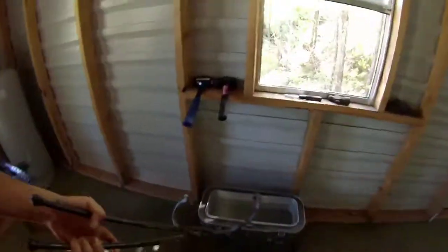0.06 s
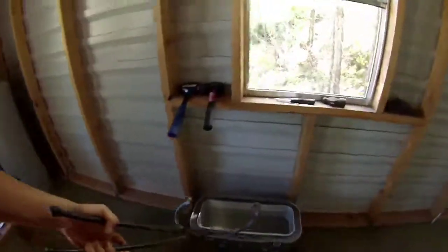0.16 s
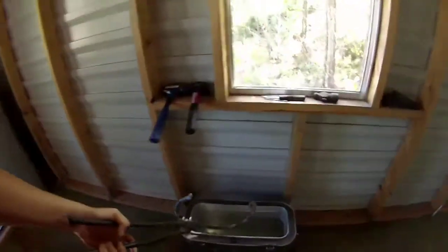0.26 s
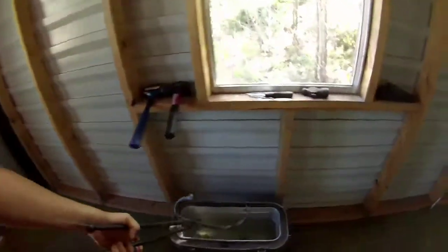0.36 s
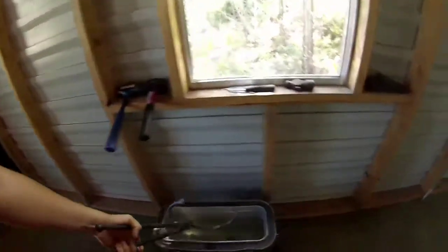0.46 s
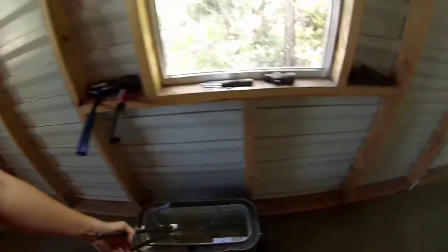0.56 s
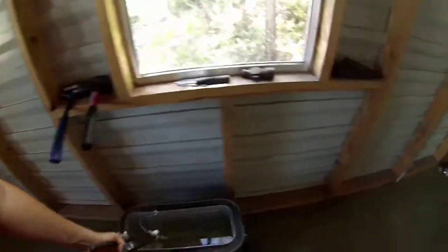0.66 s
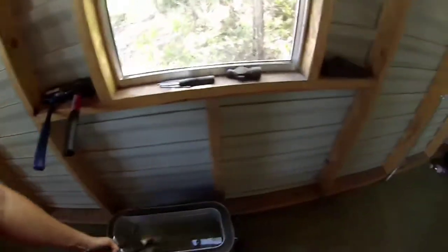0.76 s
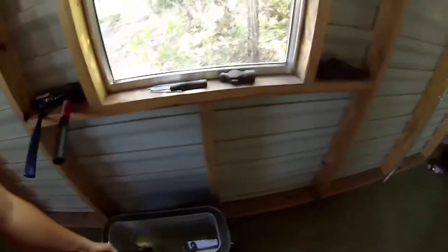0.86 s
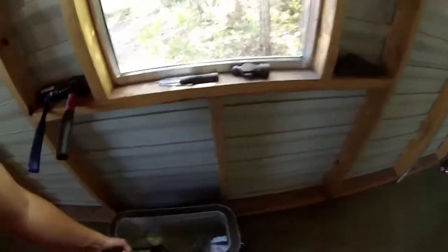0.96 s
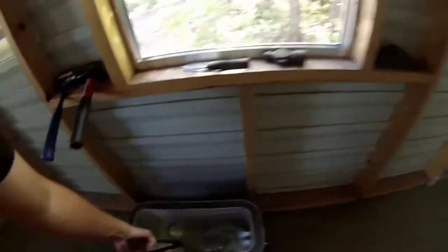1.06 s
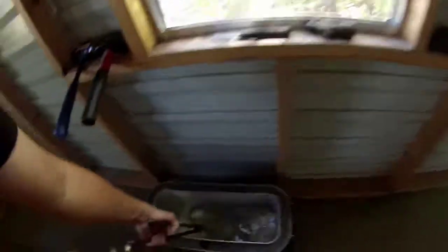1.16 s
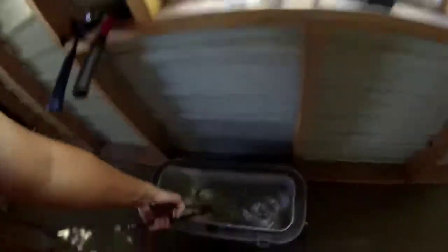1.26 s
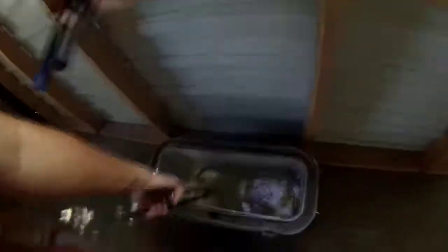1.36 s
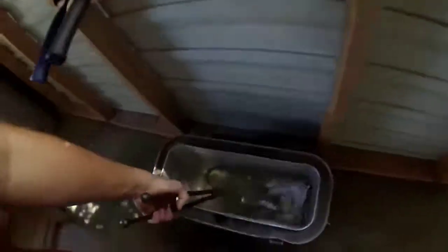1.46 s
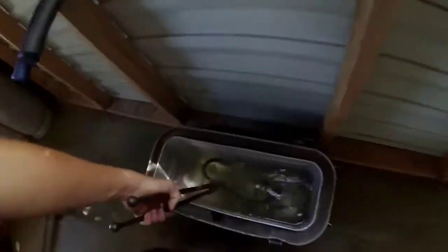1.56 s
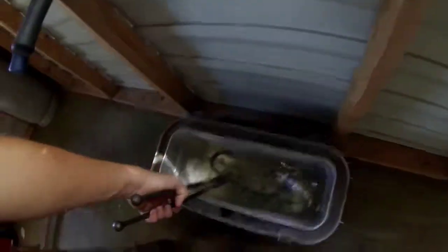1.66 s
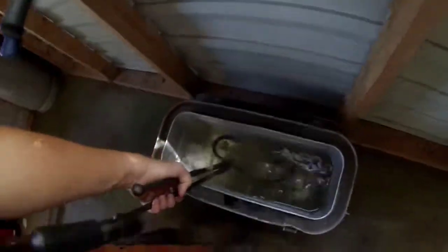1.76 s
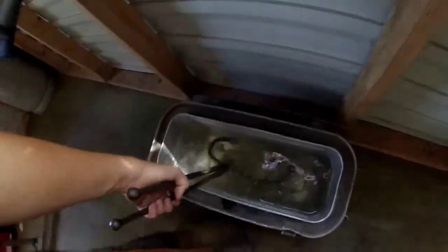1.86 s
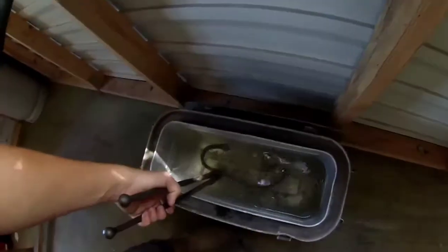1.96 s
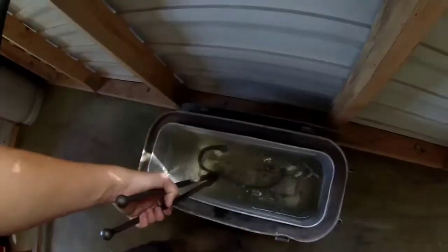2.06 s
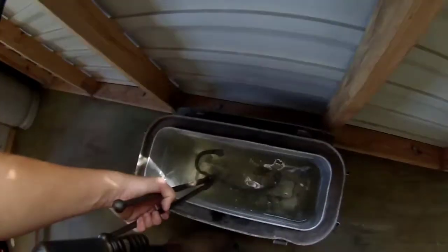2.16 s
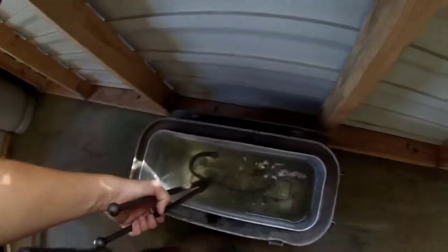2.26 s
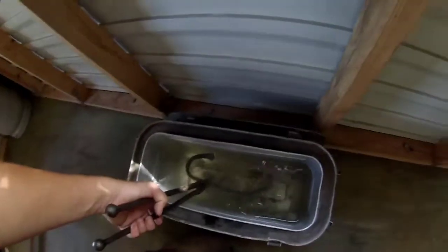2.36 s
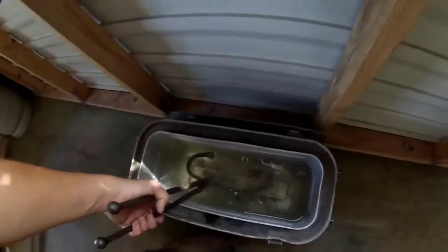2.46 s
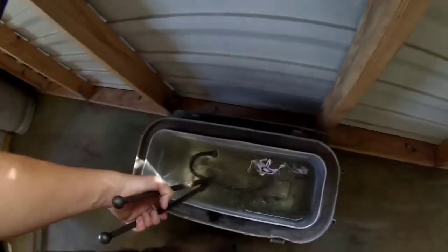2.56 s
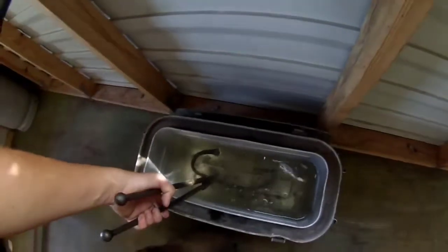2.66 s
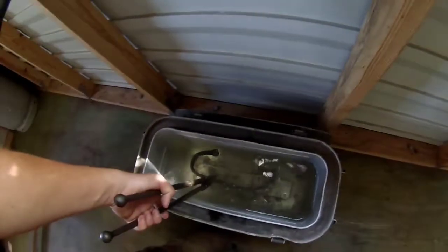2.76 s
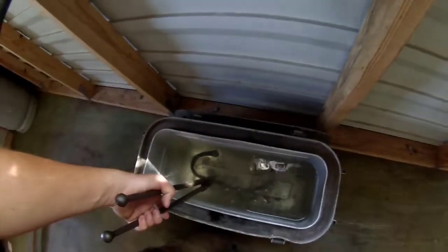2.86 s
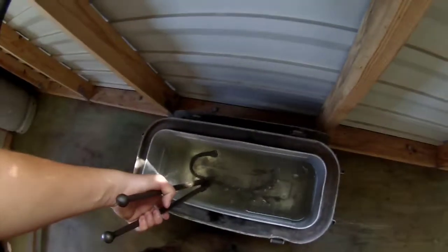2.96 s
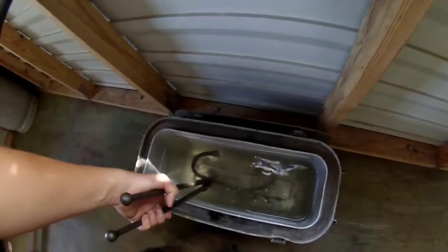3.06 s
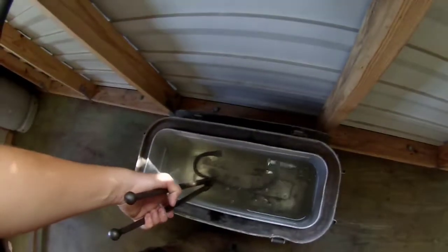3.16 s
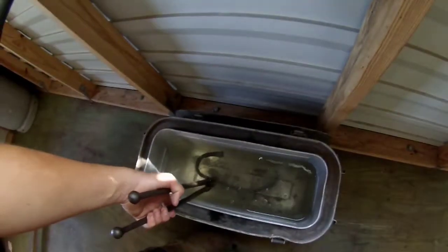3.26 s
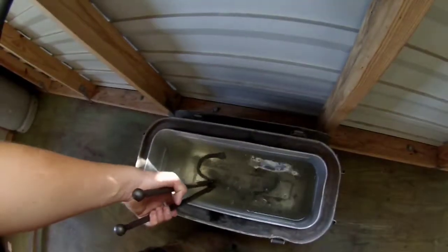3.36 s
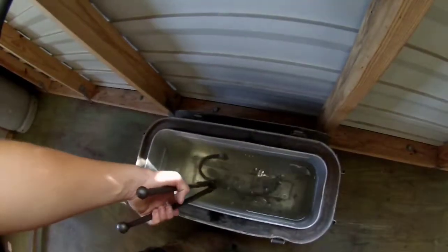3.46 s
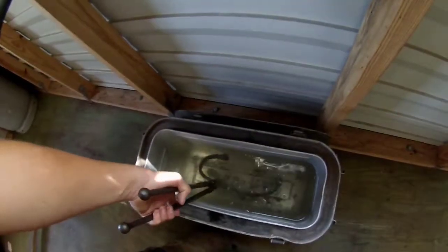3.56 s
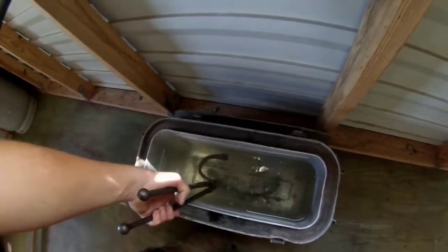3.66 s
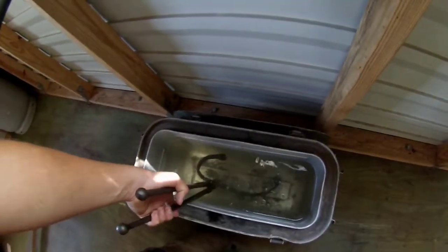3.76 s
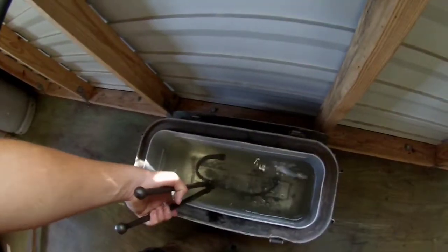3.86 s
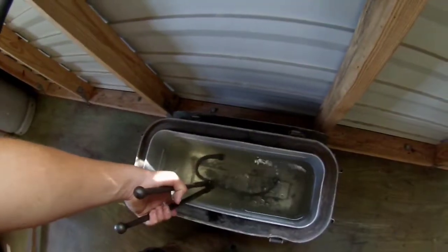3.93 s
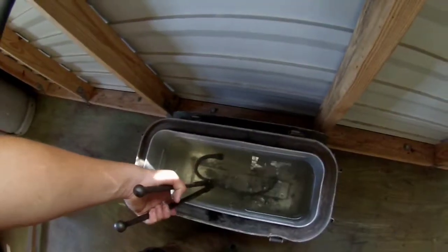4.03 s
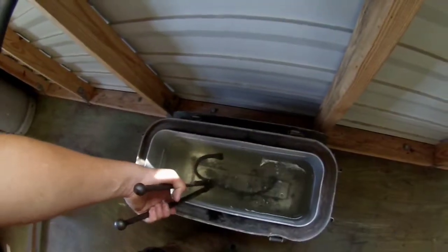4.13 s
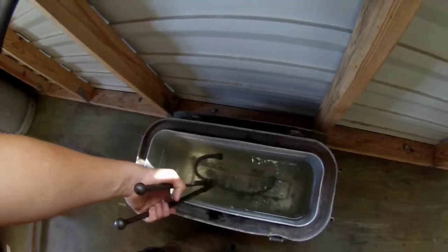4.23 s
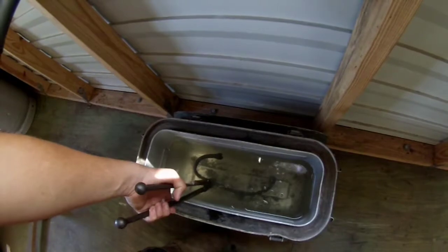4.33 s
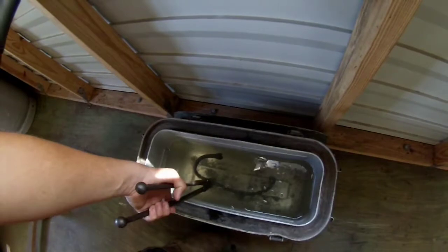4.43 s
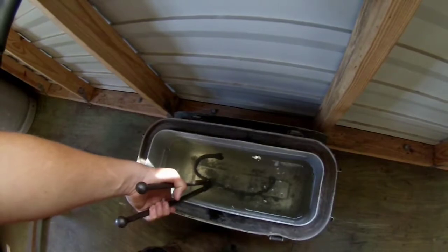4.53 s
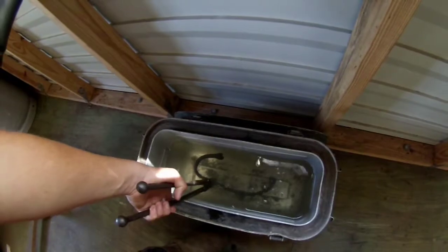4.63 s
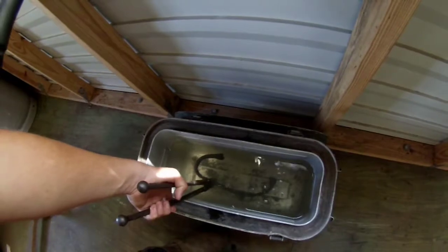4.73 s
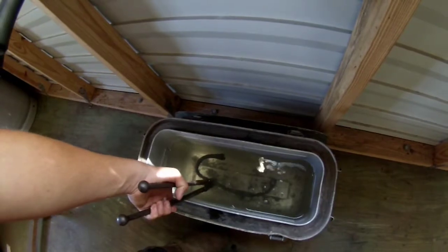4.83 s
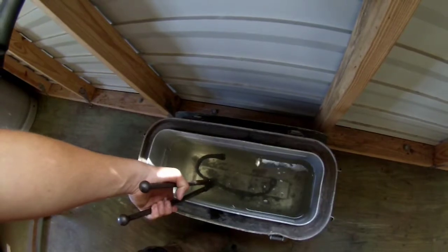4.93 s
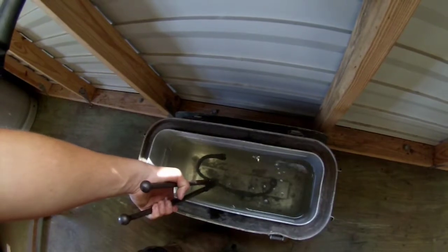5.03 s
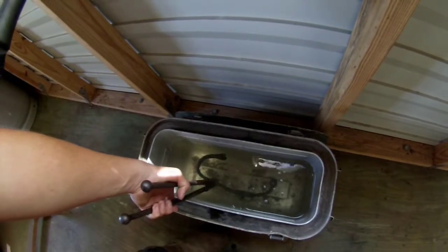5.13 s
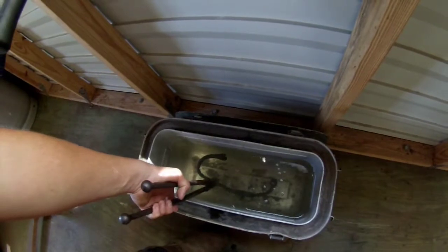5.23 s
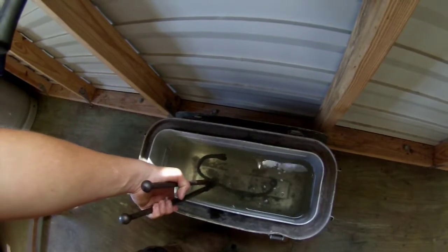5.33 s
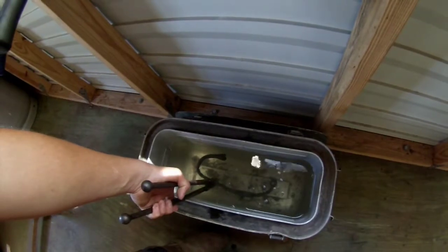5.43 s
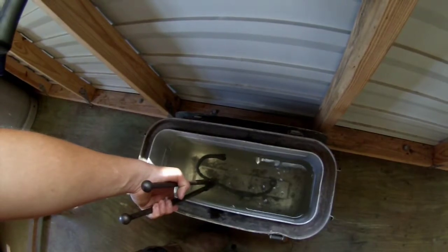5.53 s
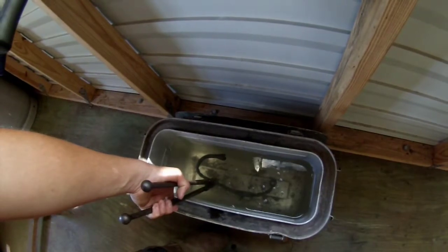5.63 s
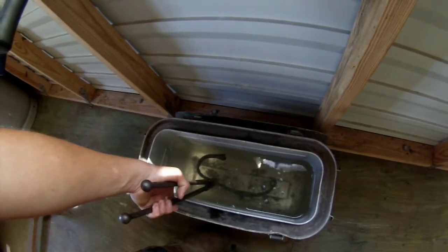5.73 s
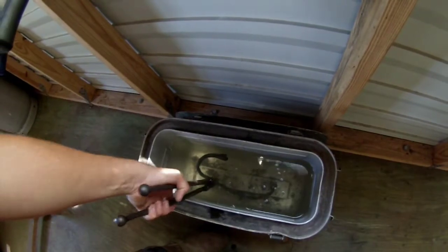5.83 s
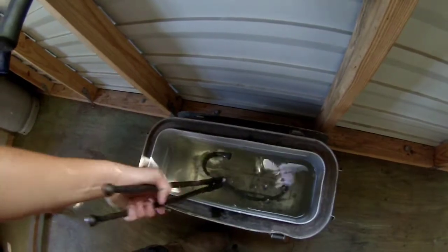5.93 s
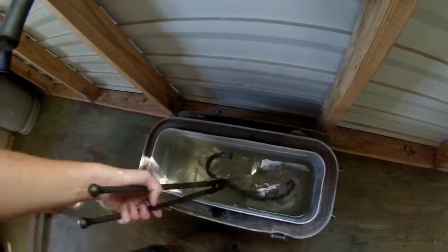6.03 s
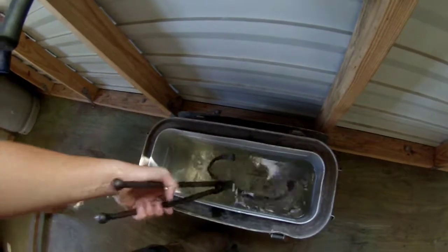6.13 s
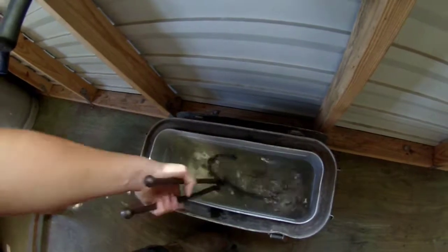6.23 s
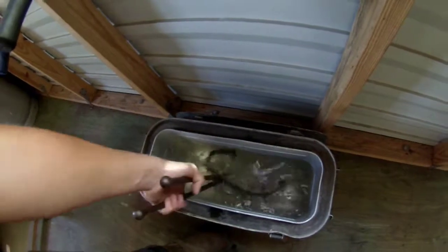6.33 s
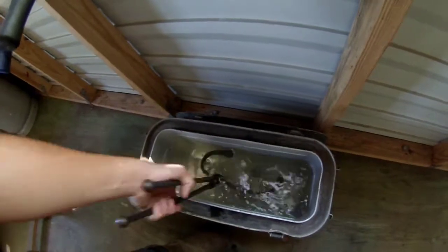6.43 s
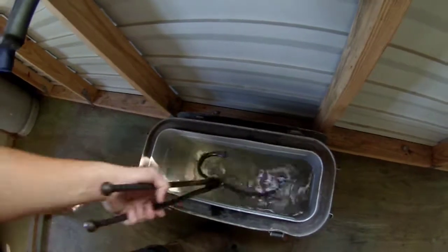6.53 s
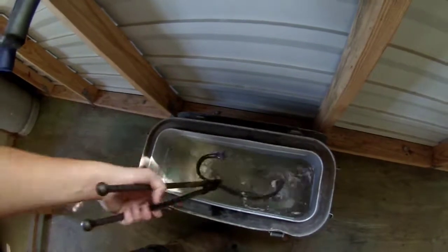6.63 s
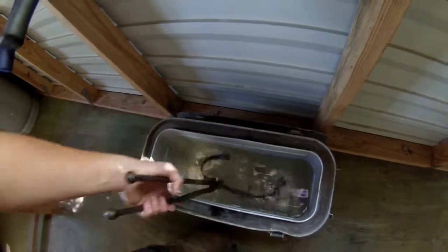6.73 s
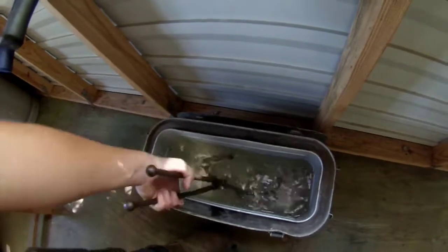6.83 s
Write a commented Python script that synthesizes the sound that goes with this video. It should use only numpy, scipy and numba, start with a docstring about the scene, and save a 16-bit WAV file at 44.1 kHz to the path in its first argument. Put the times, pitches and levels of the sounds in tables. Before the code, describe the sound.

Heard from close by in a small, slightly echoing shed, shoes knock on floorboards before hot metal is dipped into a plastic tub of water. Steam hisses and sputters in surges over a gurgling boil, then cuts off and gives way to a quiet simmer of tiny bubbles. Finally the water is stirred, and collapsing steam bubbles knock against the tub amid sloshes and drips.

```python
"""Hot steel quenched in a plastic tub of water: steam hisses over a boil that climbs in pitch.
The hiss stops short and leaves a singing simmer of small bubbles. When the steel is stirred,
vapour pockets collapse and knock the tub, and drops plink. At the start, steps ring the
wooden floor of the small shed, whose walls reverberate throughout."""
import sys
import numpy as np
from scipy import signal
from scipy.fft import rfft, irfft
from scipy.io import wavfile
from scipy.ndimage import uniform_filter1d
from numba import njit

SR = 44100
rng = np.random.default_rng(int(sys.argv[2]) if len(sys.argv) > 2 else 0)


def generate_wav(signal):
    """Clip the signal to [-1, 1] and save it as 16-bit WAV at the path in sys.argv[1]."""
    frames = np.transpose(np.atleast_2d(signal))
    scaled = np.clip(frames, -1, 1) * 32767
    pcm = np.round(scaled).astype(np.int16)
    wavfile.write(sys.argv[1], SR, pcm)


N = 303710
T = np.arange(N) / SR
HZ = np.fft.rfftfreq(2 * N, 1 / SR) + 1e-3


def undb(db):
    """Decibels to gain."""
    return 10 ** (np.asarray(db) / 20)


def unit(x):
    """Scale to unit rms."""
    return x / np.std(x)


def spectrum(points):
    """Gain per frequency from (f/Hz, level/dB) points."""
    hz, db = np.transpose(points)
    return undb(np.interp(np.log(HZ), np.log(hz), db))


def shape(x, gain):
    """Filter by a gain per frequency."""
    return irfft(rfft(x, 2 * N) * gain)[:N]


def butter(x, hz, kind, order=2):
    """Causal low-, high- or band-pass."""
    sos = signal.butter(order, np.minimum(hz, SR / 2 - 1), kind, fs=SR, output="sos")
    return signal.sosfilt(sos, x)


def add(out, s, sound):
    """Mix in at time s; negative times land at zero."""
    i = int(np.clip(s * SR, 0, N - 1))
    out[i:i + len(sound)] += sound[:N - i]


def fade(t, t60):
    """Exponential decay, -60 dB at t60."""
    return np.exp(-np.log(1000) * t / t60)


def held(s, hold_s, rise_s, t60):
    """Envelope: rises from s, decays from s + hold_s."""
    return np.clip((T - s) / rise_s, 0, 1) * fade(np.maximum(T - s - hold_s, 0), t60)


def walk(rate_hz):
    """Smooth random wander, unit spread."""
    k = int(SR / rate_hz)
    return unit(uniform_filter1d(np.repeat(rng.standard_normal(N // k + 1), k), k)[:N])


def pops(per_s, spread_db):
    """Random clicks of uneven size."""
    chance, size, sign = rng.random(N), rng.exponential(size=N), rng.standard_normal(N)
    return unit((chance < per_s / SR) * undb(spread_db * np.minimum(size, 5)) * sign)


@njit
def resonate(x, hz, width_hz):
    """State-variable band-pass; centre and width per sample."""
    y, band, low = np.empty(len(x)), 0., 0.
    for i in range(len(x)):
        g, damping = np.tan(np.pi * hz[i] / SR), width_hz[i] / hz[i]
        v = (band + g * (x[i] - low)) / (1 + g * (g + damping))
        band, low = 2 * v - band, low + 2 * g * v
        y[i] = damping * v
    return y


def cloud(hz, width_hz, per_s):
    """Bubbles ringing around one steady or moving pitch, at even power."""
    hz, width_hz = hz * np.ones(N), width_hz * np.ones(N)
    ring = resonate(pops(per_s, 1.37), hz, width_hz)
    return unit(resonate(ring, hz, width_hz) / np.sqrt(width_hz))


def swishes(rows, colour):
    """Grainy noise bursts: instant onset, hold, decay."""
    envelope = sum(undb(db) * held(s, hold_s, 0.00083, t60) for s, db, hold_s, t60 in rows)
    return envelope * unit(shape(pops(9000, 0.5), spectrum(colour)))


def blows(rows, modes, crack_t60, focus, clatter_db, clatter_t60, detune=0.02):
    """Each blow rings the modes near its pitch, with a sharp crack and a dull clatter."""
    out, t = np.zeros(N), T[:SR // 2]
    hz, db, t60 = np.transpose(modes)[:, :, None]
    polarity = (-1) ** np.arange(len(modes))[:, None]
    for s, thump_db, pitch_hz, crack_db, top_hz in rows:
        weight = undb(db) * np.exp(-focus * np.log(hz / pitch_hz) ** 2)
        loaded_hz = hz * (1 + detune * rng.standard_normal(hz.shape))  # load shifts per blow
        partials = polarity * weight * np.sin(2 * np.pi * loaded_hz * t) * fade(t, t60)
        ring = partials.sum(axis=0) / np.linalg.norm(weight)
        noise = rng.standard_normal((2, len(t)))
        crack = butter(noise[0], top_hz * 1.08, "low", order=2 if top_hz > 1600 else 4)
        crack = unit(butter(crack, 290, "high")) * fade(t, crack_t60)
        clatter = unit(butter(noise[1], [pitch_hz / 2, pitch_hz * 2.6], "band")) * fade(t, clatter_t60)
        add(out, s, undb(thump_db) * (ring + undb(clatter_db) * clatter) + undb(crack_db) * crack)
    return out


# Shed air spectrum: f/Hz, level/dB
AIR_COLOUR = [(15, -23), (25, -11), (159, -4.5), (198, -4.5), (563, -7.5), (627, -5), (736, -9),
              (1370, -14.5), (1880, -15), (2040, -11), (4000, -18.5), (8250, -14), (9440, -13.5),
              (15300, -17.5)]


def air(level_db=-53.5):
    """Still air: faint noise, wavering by about 1 dB."""
    return unit(shape(rng.standard_normal(N), spectrum(AIR_COLOUR))) * undb(level_db + walk(5.5))


def rumble(rest_db=-60.5, opening_db=-33, step_gain_db=-35, knock_gain_db=-33, t60=1.55):
    """Low rumble: swells at the start and is stirred up by each step and knock."""
    shakes = [(0, opening_db)]
    shakes += [(s, db + step_gain_db) for s, db, *_ in STEPS]
    shakes += [(s, db + knock_gain_db) for s, db, *_ in KNOCKS]
    power = undb(rest_db) ** 2 + sum((undb(db) * held(s, 0, 0.023, t60)) ** 2 for s, db in shakes)
    colour = [(20, -9), (34, -4), (46, -8), (60, 5), (85, -3), (130, -14), (250, -17), (800, -54)]
    return unit(shape(rng.standard_normal(N), spectrum(colour))) * np.sqrt(power)


# Shed reverberation: f/Hz, t60/s
ROOM_T60 = [(100, 0.69), (500, 0.66), (2000, 0.83), (6000, 0.68), (14000, 0.6)]


def room(x, wet_db):
    """Diffuse ring of timber and sheet-metal walls, decaying per octave band."""
    t, tail = T[:int(0.8 * SR)], 0
    table_hz, t60 = np.transpose(ROOM_T60)
    for hz in 62.5 * 2 ** np.arange(8):
        band = butter(rng.standard_normal(len(t)), [hz, 2 * hz], "band")
        tail = tail + band * fade(t, np.interp(np.log(hz * np.sqrt(2)), np.log(table_hz), t60))
    tail = butter(tail * np.clip(t / 0.0075, 0, 1), 8000, "low", order=1)
    return x + undb(wet_db) * signal.fftconvolve(x, tail / np.linalg.norm(tail))[:N]


# Shoe scuffs: t/s, level/dB, hold/s, t60/s
SCUFFS = [(0, -35.5, 0.035, 0.7), (.348, -40.5, 0.015, 0.43), (.458, -27.5, 0.038, 0.48)]
# Scuff spectrum: f/Hz, level/dB
SCUFF_COLOUR = [(200, 8.5), (700, 4), (1400, -1), (2500, 1), (5000, -2.5), (9000, -6), (15000, -16)]


def scuffs():
    """Shoes rub on the boards."""
    return swishes(SCUFFS, SCUFF_COLOUR)


# Heels and weight shifts: t/s, thump/dB, pitch/Hz, crack/dB, nominal crack top/Hz
STEPS = [(.004, -23, 220, -49, 2000), (.036, -13, 225, -25, 1400), (.277, -31.5, 108, -40.5, 2000),
         (.416, -31, 600, -30.5, 1500), (0.4573, -15, 177, -27, 6000), (.559, -12, 255, -20, 1300),
         (1.4383, -8.5, 216, -13.5, 11000)]
# Floor modes: f/Hz, level/dB, t60/s
FLOOR_MODES = [(76.7, -2, 0.37), (130, 1, 0.13), (176.7, -2, 0.22), (213, 3, 0.1), (281.3, -1, 0.14),
               (309.6, -3, 0.099), (405, -2, 0.065), (472, -14, 0.15), (547, -3, 0.046), (674, -11, 0.11),
               (816, -12, 0.17)]


def footsteps(shift_s=-0.47, thump_gain_db=-15.5, crack_gain_db=-20, pitch_ratio=1.3):
    """Feet ring the boards; also a soft thump at the very start, then two faint, higher taps."""
    # five of the seven soft copies land together at time zero
    soft = [(s + shift_s, thump_db + thump_gain_db, hz * pitch_ratio, crack_db + crack_gain_db, top_hz)
            for s, thump_db, hz, crack_db, top_hz in STEPS]
    return blows(STEPS + soft, FLOOR_MODES,
                 crack_t60=0.048, focus=1.17, clatter_db=-10.5, clatter_t60=0.33)


# Swirl spectrum: f/Hz, level/dB
SWIRL_COLOUR = [(150, -20), (500, -1), (800, -7), (2000, -20), (8000, -45)]


def swirl(start_s=5.895, rise_s=0.055, level_db=-48, t60=0.25):
    """Water swirls round the tongs as they start to move."""
    wash = unit(shape(pops(9000, 0.5), spectrum(SWIRL_COLOUR)))
    return undb(level_db) * held(start_s, rise_s, rise_s, t60) * wash


def froth(count=90, t60=0.02):
    """Tiny surface bubbles burst with a brief high ring; stirring brings up more."""
    out, t = np.zeros(N), T[:SR // 20]
    for when, pitch, smallness in rng.random((count, 3)):
        s = np.interp(when, [0, 0.4, 1], [4.2, 6.1, 6.85])
        hz = np.full(len(t), 6000 + 8000 * pitch)
        db = np.interp(s, [5.9, 6.25], [-62, -46]) - 12 * smallness
        ring = unit(resonate(rng.standard_normal(len(t)), hz, hz / 5))
        add(out, s, undb(db) * ring * fade(t, t60))
    return out


def slosh(lag_s=0.0077, gain_db=-17, hold_s=0.02, t60=0.46):
    """Water thrown up by each knock falls back in a short wash."""
    rows = [(s + lag_s, crack_db + gain_db, hold_s, t60) for s, _, _, crack_db, _ in KNOCKS]
    colour = [(150, 7), (400, 3.5), (900, 1.5), (1800, -11), (5000, -15.5), (9000, -19), (15000, -29)]
    return swishes(rows, colour)


# Spray bands: f/Hz, width/Hz, level/dB re throw, t60/s
SPRAY_BANDS = [(4870, 840, -6.5, 0.044), (8250, 520, -7.5, 0.045), (9600, 2600, -2.5, 0.043),
               (13500, 4000, -10, 0.027)]


def spray(reference_hz=12100, db_per_octave=14):
    """Knocks throw bright spits of droplets; sharper cracks throw more."""
    out, t = np.zeros(N), T[:SR // 4]
    for s, _, _, crack_db, top_hz in KNOCKS:
        throw_db = crack_db + db_per_octave * np.log2(top_hz / reference_hz)
        for hz, width_hz, db, t60 in SPRAY_BANDS:
            noise = butter(rng.standard_normal(len(t)), [hz - width_hz / 2, hz + width_hz / 2], "band")
            add(out, s, undb(throw_db + db) * unit(noise) * fade(t, t60))
    return out


# Single bubbles and drops: t/s, f/Hz, level/dB
PLINKS = [(3.46, 449, -31), (3.852, 466, -42), (3.929, 439, -41), (4.37, 437, -45), (5.14, 121.6, -50),
          (6.0175, 2260, -30.5), (6.074, 1400, -29), (6.196, 1256, -25), (6.218, 2375, -16),
          (6.2235, 669, -13.5), (6.244, 662, -11.5), (6.854, 505, -15.5), (6.876, 676, -14)]


def plinks(glide=0.058, attack_cycles=1.1, t60_cycles=68):
    """A trapped bubble rings and rises slightly in pitch; small ones speak and die sooner."""
    out, t = np.zeros(N), T[:SR // 3]
    for s, hz, db in PLINKS:
        t60 = t60_cycles / hz
        phase = 2 * np.pi * hz * (t + glide * t ** 2 / (2 * t60))
        attack = 1 - np.exp(-t * hz / attack_cycles)
        add(out, s, undb(db) * np.sin(phase) * fade(t, t60) * attack)
    return out


# Vapour collapses: t/s, thump/dB, pitch/Hz, crack/dB, nominal crack top/Hz
KNOCKS = [(.9262, -4, 674, -8, 3100), (.943, -8, 393, -11, 3920), (6.146, -9, 490, -16, 3700),
          (6.162, -8, 400, -32, 2500), (6.193, -19.5, 494, -27, 4500), (6.224, -20, 890, -29, 12400),
          (6.4094, -11, 506, -27, 4000), (6.4138, -7, 510, -15, 13300), (6.656, -8, 685, -13.5, 4300),
          (6.6705, -21.5, 800, -10, 8000), (6.852, -21.5, 600, -26.5, 12000), (6.875, -26, 600, -21, 7000)]
# Filled tub modes: f/Hz, level/dB, t60/s
TUB_MODES = [(60, 12, 0.16), (90, 11, 0.15), (143, -1.5, 0.15), (228.5, -3, 0.076), (309, -3.5, 0.09),
             (378, -3.5, 0.11), (453, 2, 0.072), (627, -4, 0.073), (698, -6.5, 0.087), (797, -4.5, 0.089),
             (970, -4, 0.06), (1310, -37, 0.019), (1790, -1, 0.019), (2190, -65, 0.03)]


def knocks():
    """Collapsing vapour pockets strike the tub."""
    return blows(KNOCKS, TUB_MODES, crack_t60=0.032, focus=0.74, clatter_db=-10, clatter_t60=0.078)


# Swarms of like-sized bubbles: t/s, hold/s, f/Hz, width/Hz, level/dB
SWARMS = [(1.05, .3, 720, 500, -36), (1.15, 0.3, 7360, 1200, -33.5), (1.315, 0.16, 1340, 393, -34),
          (1.5, 0.66, 175, 130, -40.5), (2.35, .4, 1350, 450, -36.5), (2.52, 0.24, 6600, 500, -34.5),
          (2.35, .9, 3420, 450, -38), (3.263, 0.27, 440, 150, -43.5), (3.3, 0.4, 4110, 450, -42.5),
          (3.5, .45, 8400, 1000, -48.5), (3.8, 0.98, 9840, 1610, -52), (4.007, 1.1, 5860, 1250, -47.5)]


def swarms(waver_db=1.5, swell_per_hold=0.29, sag_db_per_s=11, t60=1.0):
    """Each swarm swells, sings around its pitch and dies unevenly."""
    out = 0
    for s, hold_s, hz, width_hz, db in SWARMS:
        swell = np.exp(-(np.minimum(T - s, 0) / (swell_per_hold * hold_s)) ** 2)
        sag = undb(-sag_db_per_s * np.maximum(T - s, 0))
        envelope = swell * sag * fade(np.maximum(T - s - hold_s, 0), t60)
        gulps_db = waver_db * (2000 / hz) ** 0.44 * walk(17)  # big, low bubbles are few: deeper gulps
        pitch_hz = hz * (1 + 0.0052 * walk(5))
        out = out + cloud(pitch_hz, width_hz, 5000) * envelope * undb(db + gulps_db)
    return out


# Water and air resonances in the tub: f/Hz, width/Hz, lift/dB
BASIN = [(237, 15, 5.5), (451, 54, 9.5), (712, 64, 9.5), (843, 23, 7.5), (1060, 200, 7.5), (1282, 33, 10),
         (1580, 39, 7), (2053, 44, 5), (2377, 32, -1), (3130, 90, -36), (7720, 410, 3)]


def basin(depth):
    """Gain of the tub's resonances; deeper sources excite them more."""
    power = sum(undb(db) ** 2 / (1 + (2 * (HZ - hz) / width_hz) ** 2) for hz, width_hz, db in BASIN)
    return np.sqrt(1 + depth * power)


# Fizz spectrum: f/Hz, level/dB
FIZZ_COLOUR = [(300, -1.5), (1000, -13), (1700, 3), (3000, 5), (4700, 2.5), (5400, 0), (6500, -2.5),
               (7500, 0), (9500, 0), (12000, -2), (15000, -10)]
# Sunken steel modes: f/Hz, width/Hz, level/dB
STEEL_MODES = [(2040, 110, -56), (2387, 150, -46.8)]


def simmer(onset_s=0.14, fizz_db=-37, fizz_sag_db_per_s=13, end_s=5.58, fade_s=0.5,
           ring_sag_db_per_s=9.5, ring_end_s=5.52):
    """As the hiss stops, a fine fizz takes over, rings the sunken steel and fades."""
    age_s = T - STEAM_STOP_S
    fizz = unit(shape(pops(12000, 2.3), spectrum(FIZZ_COLOUR) * basin(1.9)))
    fizz *= undb(fizz_db - fizz_sag_db_per_s * age_s) * np.clip((end_s - T) / fade_s, 0, 1)
    ring = sum(undb(db) * cloud(hz, width_hz, 5000) for hz, width_hz, db in STEEL_MODES)
    ring *= undb(-ring_sag_db_per_s * age_s) * fade(np.maximum(T - ring_end_s, 0), t60=0.3)
    return np.clip(1 + age_s / onset_s, 0, 1) * (fizz + ring)


# Underwater boil strength: t/s, level/dB
BOIL_LEVEL = [(1.62, -38.5), (1.96, -30.5), (2.45, -27.5), (3.24, -35), (3.78, -48), (5.5, -78.5)]


def boil(start_s=0.91, rise_s=0.038, start_hz=448, climb_hz_per_s=204, top_hz=1080,
         roar_gain_db=-2.7, note_gain_db=-7, burble_db=-34.5, burble_hold_s=1.0, sag_db_per_s=9.5):
    """Vapour bubbles shrink and rise in pitch as the steel cools; big slow ones burble below."""
    level_db = np.interp(T, *np.transpose(BOIL_LEVEL))
    age_s = np.maximum(T - start_s, 0)
    hz = np.minimum(start_hz + climb_hz_per_s * age_s, top_hz)
    roar = unit(shape(cloud(hz, 1.27 * hz, 4000), basin(1.0)))
    note = cloud(hz, 0.26 * hz, 4000) * undb(1.9 * walk(17))
    climbing = (undb(roar_gain_db) * roar + undb(note_gain_db) * note) * undb(level_db)
    burble = unit(shape(cloud(hz=260, width_hz=460, per_s=1500), basin(0.99)))
    burble *= undb(burble_db - sag_db_per_s * np.maximum(age_s - burble_hold_s, 0) + 3 * walk(11))
    return (climbing + burble) * np.minimum(age_s / rise_s, 1)


# Reflections off water, rim and wall: lag/s, gain
ECHOES = [(.00054, 0.11), (.00088, 0.15), (.00126, 0.044), (.00205, .17), (.0029, 0.068)]


def near_echoes(x, sway_s=0.00005):
    """Swaying echo paths send ripples through the spectrum."""
    echoes = sum(gain * np.interp(T - lag_s - sway_s * walk(2.21), T, x) for lag_s, gain in ECHOES)
    return (x + echoes) / np.sqrt(1 + sum(gain ** 2 for _, gain in ECHOES))


# Steam puff: t/s, level/dB, hold/s, t60/s
PUFFS = [(5.57, -43, 0.05, 0.29)]
# Puff spectrum: f/Hz, level/dB
PUFF_COLOUR = [(600, -9), (1250, -11), (1600, 1.5), (3000, -4), (4500, -10), (7500, -6.5), (10000, -7),
               (13000, -8), (15500, -8)]


def puff():
    """One late puff of steam leaves the water."""
    return swishes(PUFFS, PUFF_COLOUR)


STEAM_START_S, STEAM_STOP_S = 0.871, 3.325
# Steam spectrum: f/Hz, level/dB
STEAM_COLOUR = [(700, -17), (1100, -13), (1400, -4), (1700, -8), (2300, -2), (2800, -4), (3450, -4.5),
                (4700, -5.5), (6600, -4.5), (8000, -4), (11100, -6.5), (14600, -12), (15300, -13.5)]
# Surges as fresh hot metal meets the surface: t/s, hold/s, level/dB
SURGES = [(0.873, 0.083, -19.5), (0.961, 0.077, -14.5), (1.162, .28, -23), (1.653, .11, -28.5),
          (1.906, 0.743, -24), (3.09, 0.097, -28)]


def steam(steady_db=-29, sputter_db=-33.5, sputter_follow=0.59, split_hz=4500):
    """Water flashes to steam on the steel; surges lift the high hiss more than the low sputter."""
    surge_power = sum((undb(db) * held(s, hold_s, rise_s=0.04, t60=0.47)) ** 2
                      for s, hold_s, db in SURGES)
    hiss_db = 10 * np.log10(undb(steady_db) ** 2 + surge_power)
    bursts = shape(pops(34000, 0.59), spectrum(STEAM_COLOUR) * basin(0.076))
    highpass = 1 / (1 + (split_hz / HZ) ** 8)
    hiss = undb(hiss_db) * unit(shape(bursts, highpass))
    sputter = unit(shape(bursts, 1 - highpass))
    sputter *= undb(sputter_db + sputter_follow * (hiss_db - steady_db))
    gate = held(STEAM_START_S, STEAM_STOP_S - STEAM_START_S, rise_s=0.026, t60=0.1)
    flicker = undb(0.73 * walk(45.15))
    return (hiss + sputter) * gate * flicker


def scene():
    """All sources in one shed; two identical channels."""
    tub = knocks() + spray() + slosh() + froth()
    steps = footsteps()
    quench = near_echoes(steam() + simmer() + puff()) + boil() + swarms() + swirl()
    feet = steps + scuffs()
    mono = room(quench, wet_db=-12.5) + room(tub, wet_db=-14.5) + room(plinks(), wet_db=-18)
    mono += room(feet, wet_db=-7.5) + air() + rumble()
    return np.array([mono, mono])


def record(dry, top_hz=15350):
    """Soft peak rounding, then a steep low-pass."""
    rounded = 1.306 * np.tanh(dry / 1.319)
    return signal.sosfilt(signal.ellip(10, 0.2, 70, top_hz, fs=SR, output="sos"), rounded)


dry = scene()
out = record(dry)
generate_wav(out)
```